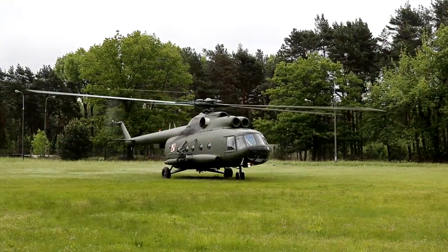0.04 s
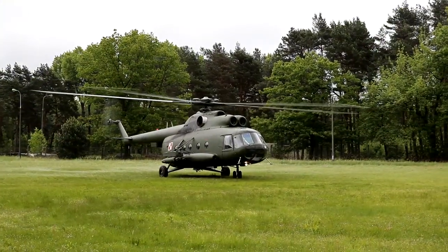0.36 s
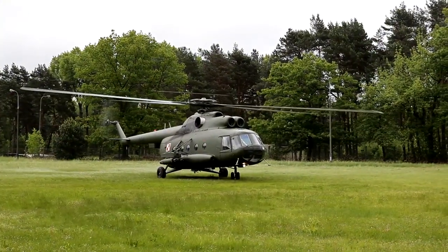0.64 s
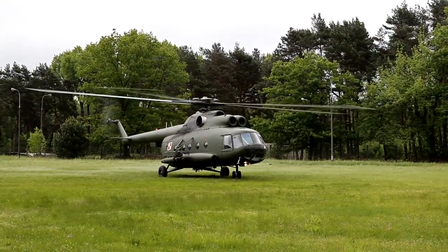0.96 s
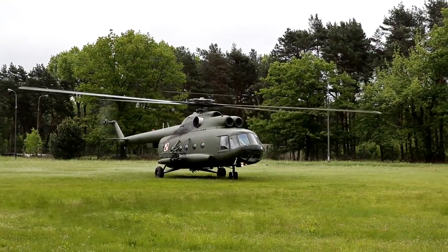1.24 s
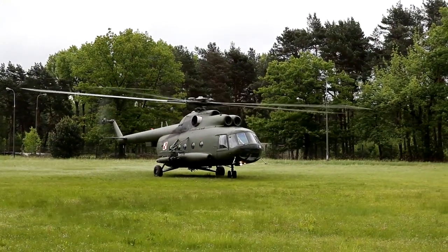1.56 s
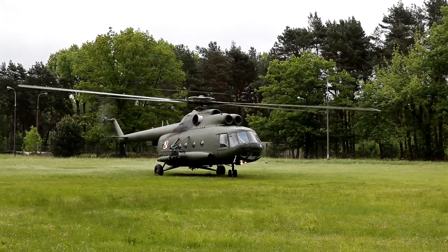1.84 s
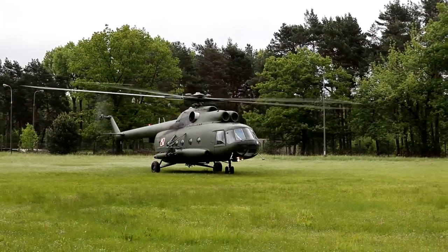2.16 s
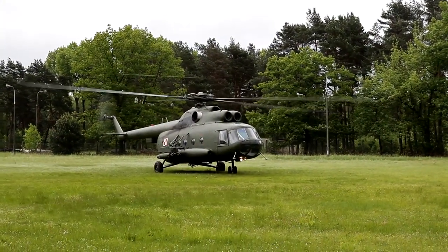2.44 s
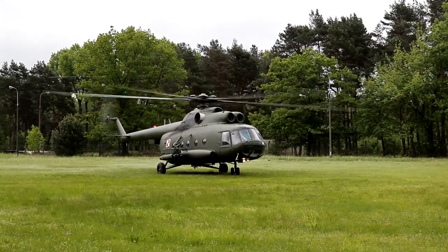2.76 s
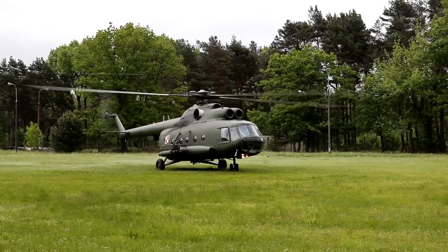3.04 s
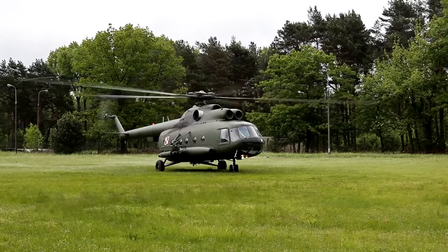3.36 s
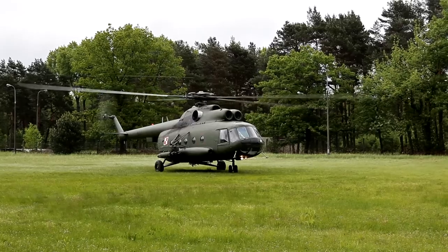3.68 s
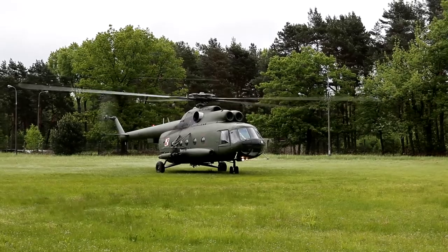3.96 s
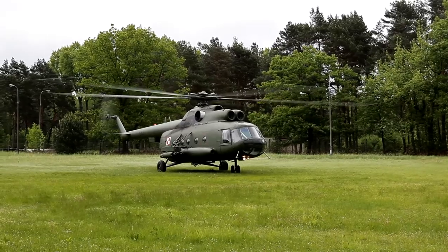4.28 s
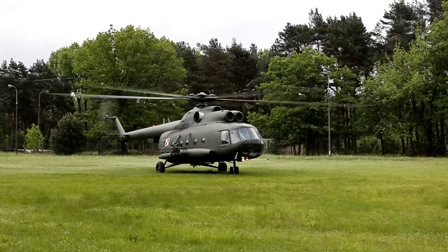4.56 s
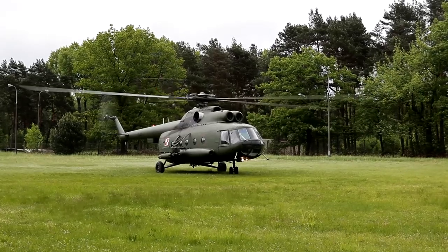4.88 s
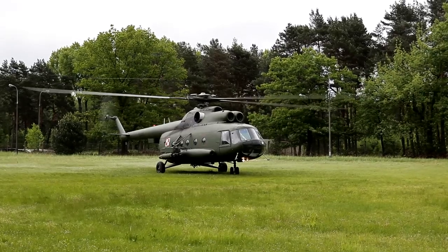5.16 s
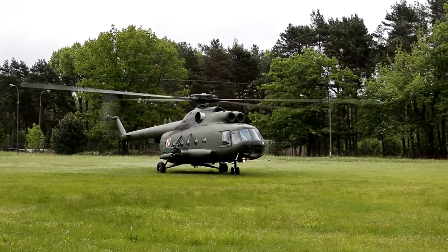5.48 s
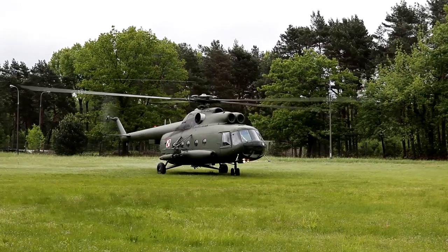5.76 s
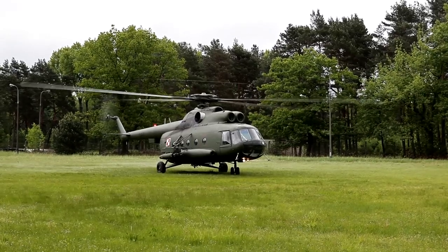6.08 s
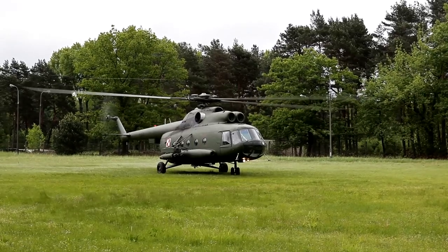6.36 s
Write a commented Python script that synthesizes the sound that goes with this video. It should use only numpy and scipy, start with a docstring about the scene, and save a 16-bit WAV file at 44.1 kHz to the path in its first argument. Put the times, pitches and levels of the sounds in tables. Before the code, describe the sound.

A helicopter's turbines whine piercingly over exhaust rumble and hiss, while its rotor blades chirp rapidly and slowly gain speed.

```python
"""The compressors of a twin-turbine helicopter whine as it runs up on a grass field.
Its five-blade rotor slowly gains speed, and each passing blade mirrors the whine and the singing
gearbox as a short falling chirp. Underneath sit the power turbine's breathy whistle, the tail
rotor's buzz and a bed of exhaust rumble, jet roar and intake hiss.
The loudest peaks overload the one microphone."""
import sys
import numpy as np
from scipy import signal
from scipy.fft import rfft, irfft, next_fast_len
from scipy.io import wavfile
from scipy.ndimage import uniform_filter1d

SR = 44100
rng = np.random.default_rng(int(sys.argv[2]) if len(sys.argv) > 2 else 0)


def master_out(mix):
    """Clip the mix to full scale and print it as 16-bit PCM to the path in sys.argv[1]."""
    frames = np.transpose(np.atleast_2d(mix))
    ceiling = np.clip(frames, -1, 1)
    pcm = np.round(ceiling * 32767).astype(np.int16)
    wavfile.write(sys.argv[1], SR, pcm)


N = 291942

# colour of the intake hiss: (frequency [Hz], relative level [dB])
HISS_COLOUR = [(600, -21), (1400, -13.5), (2100, -8), (2800, -2.5), (3400, 1), (4300, -1), (5300, 1),
               (6100, 5.5), (7100, 5), (8200, -4), (9600, -10.5), (11500, -21.5), (13500, -20.5),
               (15500, -39)]


def compressors(blade, blade_rate):
    """Intake blades whine among weaker shaft orders; each main blade flashes the whine back."""
    # compressor shaft: (time [s], speed [turns/s])
    shaft_speed = [(0, 300.2), (2.2, 300.3), (3.28, 300.6), (3.6, 305), (4, 310.2), (4.3, 311.7),
                   (4.85, 312.6), (5.25, 316.7), (5.6, 318.2), (6.5, 318.6), (6.62, 317.5)]
    # rides of the main whine, the cluster around its octave and the flashes: (time [s], level [dB])
    whine_ride = [(0, -23.5), (.65, -27), (.93, -20.5), (1.5, -25), (1.74, -15), (2.1, -23.5), (2.35, -17),
                  (2.63, -25), (2.88, -14.5), (3.55, -16), (3.87, -26.5), (4.08, -23), (4.8, -28),
                  (5.05, -21), (5.42, -22.5), (5.66, -20), (6.28, -23), (6.48, -12.5), (6.62, -20)]
    top_ride = [(0, -45), (2.75, -46), (3.4, -46), (4.05, -36.5), (4.75, -45.5), (6.62, -47)]
    flash_ride = [(0, -11), (.3, -7), (.7, -10), (1.28, -16), (1.45, -29), (3.7, -23), (4.5, -15.5),
                  (5.25, -26), (6.62, -29)]
    # partials beside the whine and around its octave: (pitch [multiple of shaft speed])
    side_orders = [14, 15, 19, 20, 23, 25, 27, 31, 33]
    top_orders = [36, 38, 40, 42, 44, 46]
    # balance of those partials: (relative level [dB])
    side_mix = [-28, -31, -16, -40, -1.5, -15, -18.5, -38, -33.5]
    top_mix = [-27, -14, -25, -1, -14, -23]
    main_order = 21
    shaft_hz = curve(shaft_speed) * (1 + 0.000373 * walk(9))
    shaft = turns(shaft_hz)
    whine_db = curve(whine_ride)
    side_db = -27 + 0.52 * (whine_db - whine_db.mean())  # follows about half of each swell
    main = air_fade(whine_db) * twin_tone(main_order * shaft, twin_db=-15.5, depth=0.44)
    side = sum(undb(db) * twin_tone(k * shaft, twin_db=-1, depth=1) for k, db in zip(side_orders, side_mix))
    top = sum(undb(db) * twin_tone(k * shaft, twin_db=-1, depth=.9) for k, db in zip(top_orders, top_mix))
    direct = main + air_fade(side_db) * side + air_fade(curve(top_ride)) * top
    # short waves mirror only for the instant that the blade faces the listener
    shift = 0.0054 + .014 * walk(14)  # Doppler shift as a share of the pitch, varying blade to blade
    chirp = blade_doppler(main_order * shaft_hz, blade, blade_rate, shift, sweep=0.13)
    flash = bell(blade, width=0.029) * undb(curve(flash_ride) + 0.3 * walk(27))
    echo = tone(chirp, flutter(rate=700, depth=0.9))
    echo += undb(-42) * tone(2 * chirp, flutter(rate=2000, depth=.9))
    return direct + flash * (echo + undb(-10.5) * noise(HISS_COLOUR))


def twin_tone(cycles, twin_db, depth):
    """The same tone from two engines, a little apart in speed, so that they beat."""
    detune = .9957
    near = tone(cycles, flutter(rate=75, depth=depth))
    far = tone(cycles * detune, flutter(rate=20, depth=0.85))
    return (near + undb(twin_db) * far) / np.hypot(1, undb(twin_db))


def blade_doppler(hz, blade, blade_rate, shift, sweep):
    """Cycles of a tone off a moving blade: raised as it nears, lowered as it leaves."""
    return turns(hz) + hz / blade_rate * (shift * blade - sweep * blade ** 2 / 2)


def gearbox(blade, blade_rate):
    """Meshing teeth sing a tone and two overtones, with a falling chirp off every blade."""
    # rides of the mesh tone, its octave, the chirps and their lead-ins: (time [s], level [dB])
    mesh_ride = [(0, -47), (1.0, -47.5), (1.35, -31), (2.4, -36), (2.72, -30.5), (3.45, -30), (4.05, -46),
                 (5.1, -38.5), (5.7, -45.5), (6.62, -45)]
    octave_ride = [(0, -55), (.74, -59), (.9, -37), (1.3, -36.5), (1.52, -54), (1.95, -57), (2.15, -38.5),
                   (3.35, -32.5), (3.8, -36.5), (4.8, -38), (6.62, -34.5)]
    chirp_ride = [(0, -40.5), (1.8, -37), (2.5, -28.5), (3.1, -31.5), (4.1, -36.5), (5.1, -31),
                  (5.7, -31.5), (6.15, -24.5), (6.62, -31.5)]
    lead_ride = [(0, -45), (2.45, -33), (3.3, -46), (5, -36), (5.75, -44), (6.62, -42)]
    teeth_per_pass = 119.6
    hz = teeth_per_pass * blade_rate
    mesh = turns(hz)
    first = undb(curve(mesh_ride)) * tone(mesh, flutter(rate=45, depth=0.2))
    second = undb(curve(octave_ride)) * tone(2 * mesh, flutter(rate=60, depth=0.49))
    # the mirrored tones ride on the direct ones as short pips
    chirp = blade_doppler(hz, blade, blade_rate, shift=0.028, sweep=0.22)
    pip = bell(blade, width=0.092)
    third = tone(3 * mesh, flutter(rate=70, depth=.7)) + 2 * pip * tone(3 * chirp)
    third_db = -48.5 + 7 * (blade_rate - blade_rate.mean())  # grows with rotor speed
    echo = tone(chirp, flutter(rate=190, depth=0.37))
    echo += undb(-5.5) * tone(2 * chirp, flutter(rate=200, depth=0.57))
    # while the blade still rushes in, its echo is higher and fainter
    rushing = blade_doppler(hz, blade, blade_rate, shift=0.04, sweep=0.533)
    lead_gain = undb(curve(lead_ride)) * bell(blade + 0.19, width=0.083)
    lead = lead_gain * tone(rushing, flutter(rate=160, depth=0.84))
    return first + second + undb(third_db) * third + undb(curve(chirp_ride)) * pip * echo + lead


def power_turbine(blade_rate):
    """Its blade tone leaves through the exhaust jet, which smears it into a breathy whistle."""
    # ride of the whistle: (time [s], level [dB])
    whistle_ride = [(0, -49), (1, -31), (1.65, -21), (1.9, -29), (3.1, -57), (3.8, -33), (4.5, -31),
                    (5.2, -31), (6.62, -39)]
    smear = (walk(rate=620) + 1j * walk(rate=730)) / np.sqrt(2)
    return undb(curve(whistle_ride)) * tone(turns(531 * blade_rate), smear)


def tail_rotor(blade_rate):
    """The tail blades chop the air into a low buzz whose overtones grow with tip speed."""
    tail_per_main_pass = 3.58
    cycles = turns(tail_per_main_pass * blade_rate)
    speed_db = 20 * np.log10(blade_rate / blade_rate.mean())
    first = undb(-49.0 + 1.5 * speed_db) * tone(cycles, flutter(rate=4.8, depth=0.11))
    second = undb(-44.5 + 5.8 * speed_db) * tone(2 * cycles, flutter(rate=6, depth=0.2))
    third = undb(-44.5 + 2 * speed_db) * tone(3 * cycles, flutter(rate=6, depth=.3))
    return first + second + third


def gas_flow(blade):
    """Combustion rumble rises with the throttle under jet roar and intake hiss; blades add a swish."""
    # colours of the rumble and the roar: (frequency [Hz], relative level [dB])
    rumble_colour = [(20, -56), (30, -48), (39, -31), (62, -22), (85, -8.5), (120, 2.5), (160, -4.5),
                     (210, -5), (280, -7.5), (350, -20), (480, -25.5), (1200, -53)]
    roar_colour = [(200, -7.5), (420, -14.5), (560, -3.5), (720, 1), (950, -1.5), (1200, -7), (1600, -3),
                   (2200, -10.5), (4000, -14.5), (12000, -43)]
    # rides of the roar and the hiss: (time [s], level before trim [dB])
    roar_ride = [(0, -37), (.75, -39), (1.35, -33), (2.4, -34.5), (3, -35.5), (3.7, -35), (3.97, -30.5),
                 (4.55, -35), (4.95, -34.5), (6.62, -34.5)]
    hiss_ride = [(0, -31.5), (1.1, -29.5), (1.85, -26), (2.1, -27.5), (2.5, -26), (3.1, -21.7),
                 (3.45, -22.3), (3.8, -28.7), (4.3, -28), (4.7, -31), (5.15, -29.5), (6.62, -29.5)]
    roar_trim_db, hiss_trim_db, swish_db = 1.15, 3.0, 1.87
    opens_s, opening_takes_s = 3.48, 0.26
    throttle = np.clip((np.arange(N) / SR - opens_s) / opening_takes_s, 0, 1)
    passing = bell(blade, width=0.06)
    rumble = noise(rumble_colour) * undb(-34.5 + 5 * throttle + 0.96 * walk(10))
    roar = noise(roar_colour) * undb(curve(roar_ride) + roar_trim_db + 0.11 * passing + 0.31 * walk(14))
    hiss = noise(HISS_COLOUR) * undb(curve(hiss_ride) + hiss_trim_db + swish_db * passing + 0.94 * walk(30))
    return rumble + shimmer(roar + hiss, depth_db=1.21, rate=9)


def flutter(rate, depth):
    """Hot, turbulent air makes a tone flutter in level and phase."""
    return (1 + depth * (walk(rate) + 1j * walk(rate))) / np.sqrt(1 + 2 * depth ** 2)


def air_fade(db, depth_db=1.14, rate=15):
    """Gain of a high tone that hovers near its level and drops out for moments as the air moves."""
    return undb(db + depth_db * (1 - walk(rate) ** 2))


def shimmer(x, depth_db, rate):
    """Drifting air colours a noise: overlapping bands swell and fade, each on its own."""
    size = next_fast_len(N, True)
    spectrum, f = rfft(x, size), np.fft.rfftfreq(size, 1 / SR)
    centres_hz = np.geomspace(400, 12000, 14)
    out = 0
    for weights in np.eye(len(centres_hz)):
        band = irfft(spectrum * np.interp(f, centres_hz, weights), size)[:N]
        out = out + band * undb(depth_db * walk(rate))
    return out


def undb(db):
    """Decibels to gain."""
    return 10 ** (np.asarray(db) / 20)


def curve(table):
    """An automation lane: straight lines between (time, value) points."""
    times, values = np.transpose(table)
    return np.interp(np.arange(N) / SR, times, values)


def turns(rate):
    """Cycles counted since the start."""
    return np.cumsum(rate) / SR


def tone(cycles, air=1):
    """A sine of rms 1, heard through the air's flutter."""
    return np.sqrt(2) * np.real(air * np.exp(2j * np.pi * cycles))


def noise(colour):
    """Noise of rms 1 with the given colour."""
    hz, db = np.transpose(colour)
    size = next_fast_len(N, True)
    f = np.maximum(np.fft.rfftfreq(size, 1 / SR), 1)
    eq = undb(np.interp(np.log(f), np.log(hz), db))
    x = irfft(rfft(rng.standard_normal(size)) * eq, size)[:N]
    return x / x.std()


def walk(rate):
    """Smooth random modulation of spread 1 that changes about rate times a second."""
    steps = rng.standard_normal(16384)
    x = np.interp(np.arange(N) / SR * rate, np.arange(len(steps)), steps)
    x = uniform_filter1d(x, max(int(SR / rate / 2), 1))
    return x / x.std()


def bell(x, width):
    """A smooth hump around x = 0."""
    return np.exp(-.5 * (x / width) ** 2)


def scene():
    """Engines and drive train under the turning rotor, the same in both channels."""
    # main rotor run-up: (time [s], rate [blade passes/s])
    run_up = [(0.0, 12.946), (1.0, 13.22), (2.0, 13.412), (3.0, 13.677), (3.7, 14.004), (4.4, 14.249),
              (5.0, 14.35), (5.5, 14.668), (6.0, 15.095), (6.62, 15.457)]
    blade_rate = curve(run_up)
    # place of the nearest blade, -.5 to .5 of the gap between blades; at 0 it faces the microphone
    first_pass = .09
    blade = (turns(blade_rate) - first_pass + .5) % 1 - .5
    engines = compressors(blade, blade_rate) + power_turbine(blade_rate) + gas_flow(blade)
    drive = gearbox(blade, blade_rate) + tail_rotor(blade_rate)
    return np.tile(engines + drive, (2, 1))


def record(dry):
    """The microphone overloads on the whine's peaks and adds a gritty edge; the top is cut."""
    ceiling, knee, cutoff_hz = .47, 8, 15600
    clipped = dry / (1 + np.abs(dry / ceiling) ** knee) ** (1 / knee)
    return signal.sosfilt(signal.ellip(10, .1, 80, cutoff_hz, fs=SR, output="sos"), clipped)


dry = scene()
out = record(dry)
master_out(out)
```